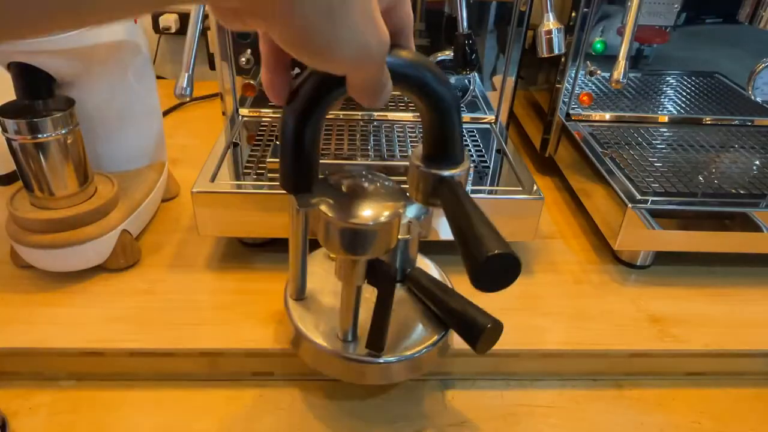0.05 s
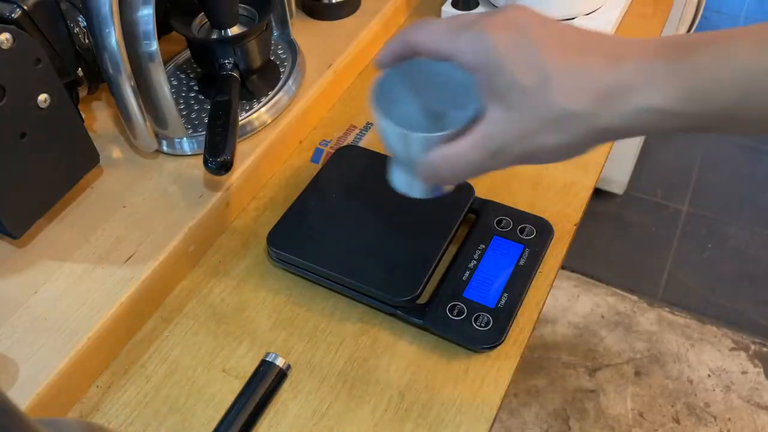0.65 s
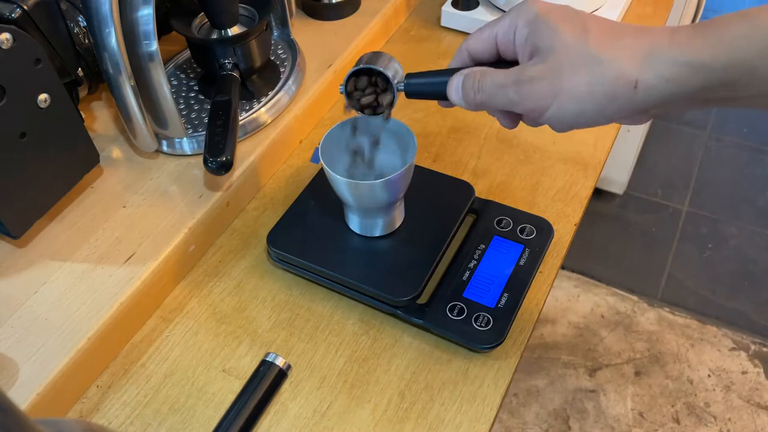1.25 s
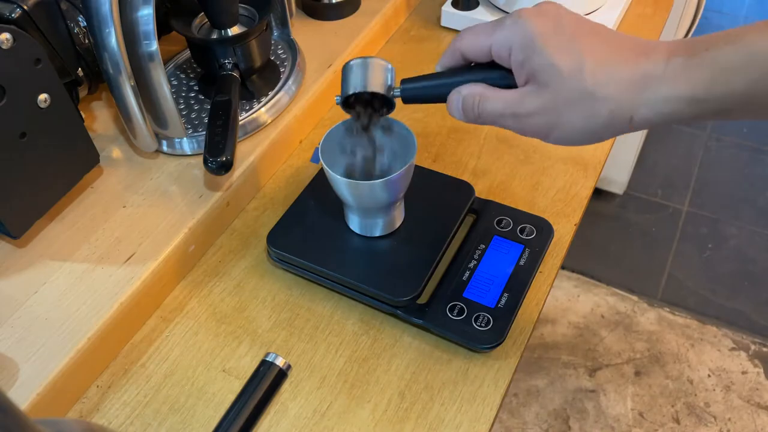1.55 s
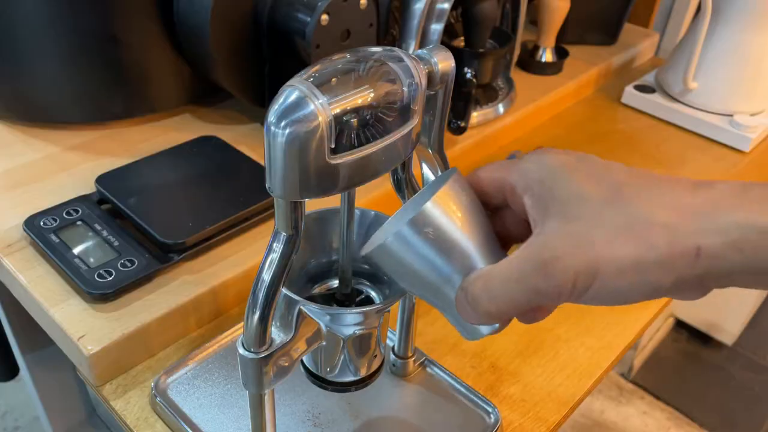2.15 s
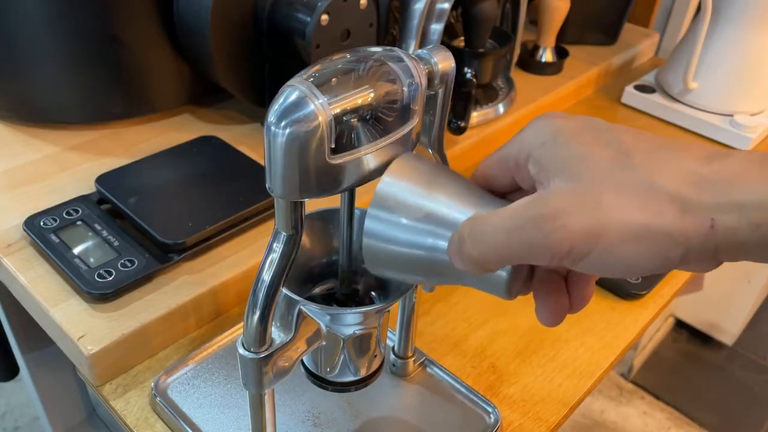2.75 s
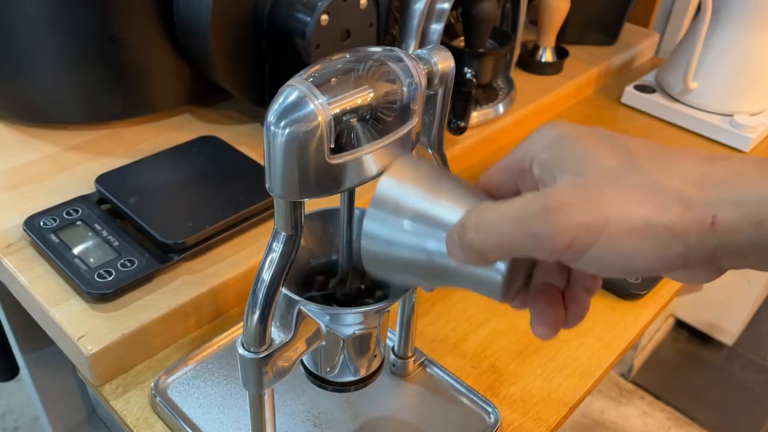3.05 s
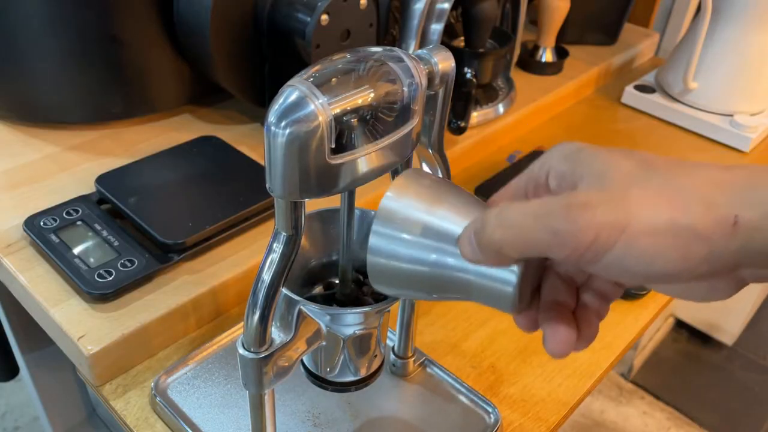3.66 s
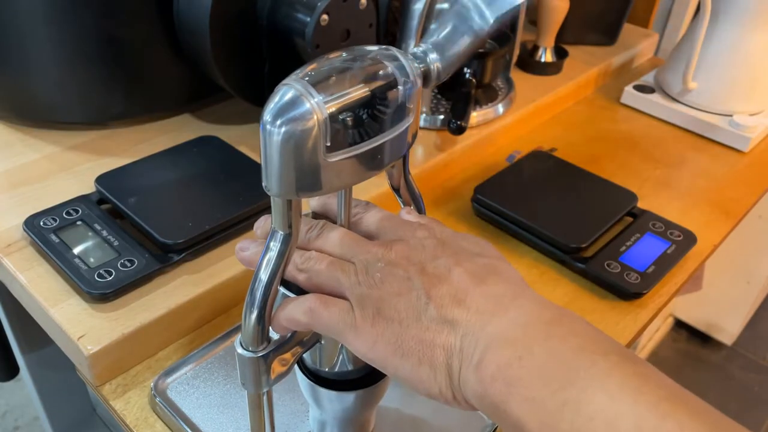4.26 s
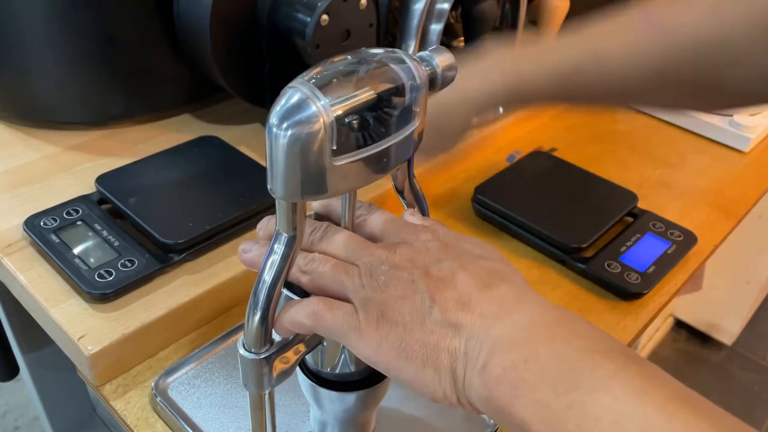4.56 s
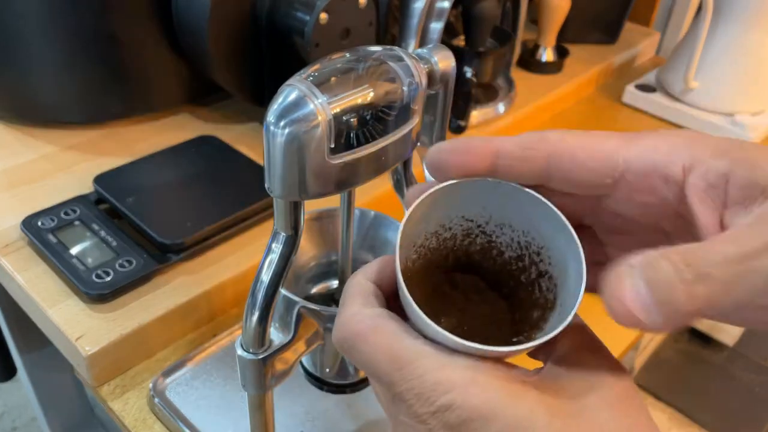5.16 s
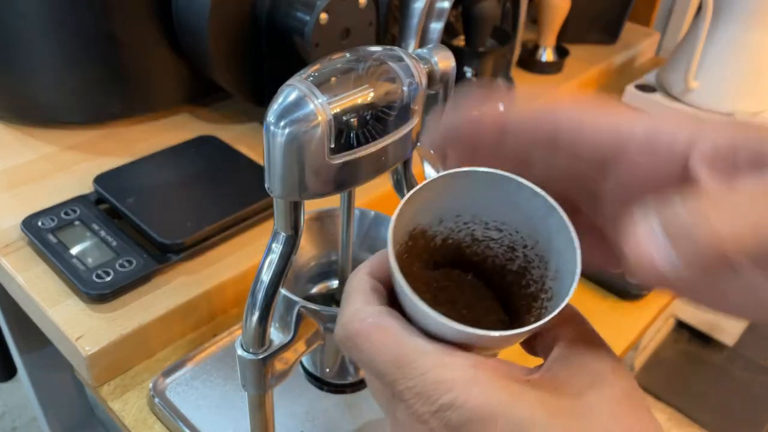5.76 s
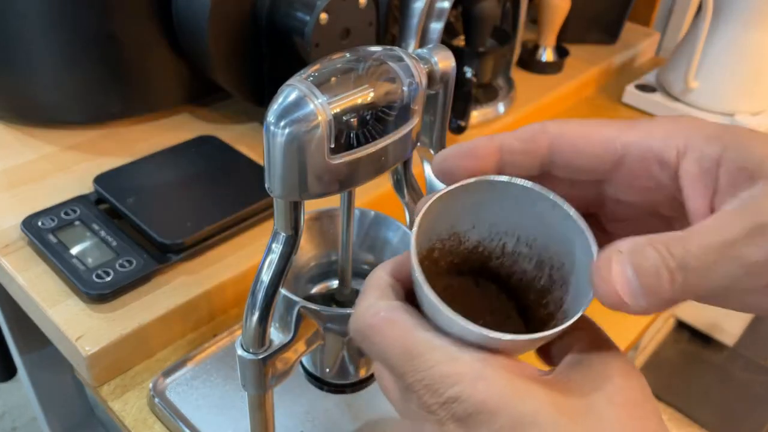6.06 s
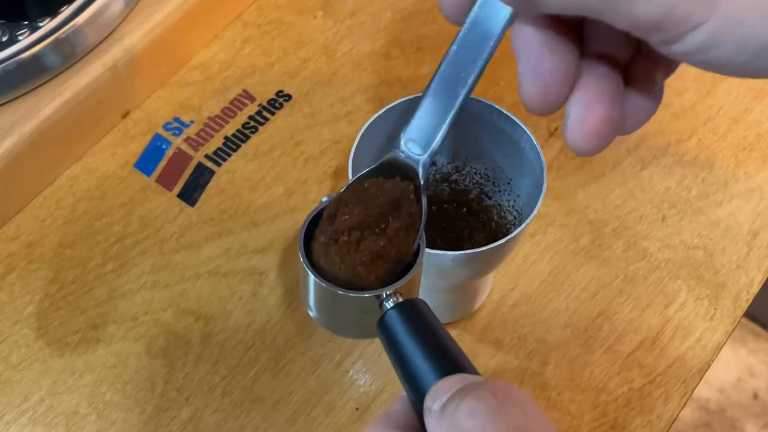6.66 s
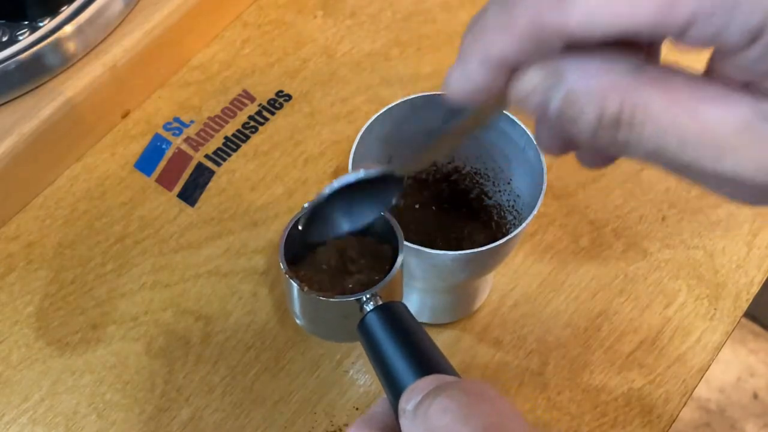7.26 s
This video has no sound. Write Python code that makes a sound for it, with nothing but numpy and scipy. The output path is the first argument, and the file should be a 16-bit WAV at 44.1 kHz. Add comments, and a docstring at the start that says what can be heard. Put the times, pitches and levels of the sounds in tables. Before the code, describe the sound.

Everything is close and in stereo, over the faint rumble and appliance hum of a quiet kitchen; each step breaks off abruptly. At 0.2 seconds a heavy steel press thuds onto a wooden counter, clattering and rocking briefly. At 1 second a cup lands on a scale with a low, dull bump. From 1.3 to 1.9 seconds coffee beans rattle brightly into the ringing metal cup. They roll softly, then slide into a hand grinder from 2.4 seconds, while the cup's rim knocks sharply against it about seven times, growing louder, with one tiny squeak. From 3.8 to 4.9 seconds the burrs crush the beans with a loud crackling rattle and a low counter rumble. Five soft, thumping palm pats on the cup follow between 5 and 6.1 seconds. A spoon clinks on a metal filter basket at 6.4 and 7.1 seconds, quietly scraping through grounds until about 7.3.

```python
"""Coffee at the kitchen counter

Close on a wooden counter, stereo microphone, quiet kitchen with humming appliances. A steel lever press is set
down, a metal cup lands on a scale, beans rattle into it and are knocked out into a hand grinder, and the burrs
crush them; the sound of each of these steps, echo and all, stops abruptly. Then a palm pats the cup of grounds,
and a spoon clinks and scrapes in a filter basket."""
import sys
import numpy as np
from scipy import signal
from scipy.fft import rfft, irfft
from scipy.io import wavfile

SR = 44100
rng = np.random.default_rng(int(sys.argv[2]) if len(sys.argv) > 2 else 0)


def master(y):
    """Save y as 16-bit WAV."""
    cut = np.clip(np.atleast_2d(y).T, -1, 1)
    pcm = np.round(cut * 32767)  # scale
    wavfile.write(sys.argv[1], SR, pcm.astype(np.int16))


N = 326781
T = np.arange(N) / SR
BLOW_T = T[:SR // 3]
# when the sound of each step stops abruptly [s]
PRESS_END, SCALE_END, FILL_END, TIP_END, GRIND_END, PATS_END = 0.467, 1.116, 1.928, 3.779, 4.931, 6.135

# ringing contacts: (time [s], level [dB], ring against crack [dB])
RIM_KNOCKS = [(2.544, -20.5, -2), (2.726, -20, -2), (2.931, -14, 0), (3.138, -12, 4.5), (3.3184, -14, 4),
              (3.515, -12, 6), (3.7192, -13, 5.5)]  # cup on hopper
SPOON_CLINKS = [(6.402, -21, 9.5), (6.673, -47, -19), (6.932, -49, -17), (6.946, -57, -16.5),
                (7.0961, -25, -22), (7.18, -45, -11), (7.29, -48, -11)]  # spoon on basket
# single contacts: (time [s], level [dB])
HOPPER_CLACKS = [(2.444, -9), (2.7871, -28.5), (2.999, -21.5), (3.068, -24.5), (3.194, -25)]  # the loose hopper in its seat
BEAN_SKIPS = [(2.064, -37), (2.097, -35.5), (2.368, -38.5), (2.847, -36), (3.018, -30)]  # in the tilted cup
BEAN_HITS = [(1.304, -14.5), (1.311, -14), (1.33, -19), (1.3481, -19.5), (1.3684, -12.5), (1.379, -17),
             (1.475, -15), (1.536, -19), (1.551, -15), (1.571, -18.5), (1.642, -16.5), (1.678, -20),
             (1.7398, -22.5), (1.829, -21.5), (1.8703, -28)]  # the hardest strikes on the steel
BEAN_BURSTS = [(4.39, -24), (4.6662, -22), (4.7456, -25)]  # between the burrs
PRESS_CLATTER = [(0.2105, -17.5), (0.2203, -14.5), (0.229, -11), (0.2353, -13.5), (0.241, -13.5),
                 (0.2467, -15.5)]  # loose steel parts
PALM_PATS = [(4.993, -36.5), (5.183, -37.5), (5.634, -36), (5.835, -38.5), (6.037, -36.5)]
# beans leave the scoop in clumps: (time [s], relative level [dB])
BEAN_CLUMPS = [(1.303, -25.5), (1.368, -26), (1.49, -27), (1.645, -24), (1.676, -28), (1.797, -31)]
# level curves: (time [s], level [dB])
BEAN_ROLL = [(1.96, -55.5), (2.09, -51.5), (2.22, -67.5)]
BEAN_SLIDE = [(2.365, -54.5), (2.42, -45.5), (2.49, -38.5), (3.15, -36.5), (3.5, -59.5)]  # flow out of the tilted cup
SCOOP_WHISPER = [(1.147, -60.5), (1.304, -63)]  # beans along the tilting scoop
BURR_LOAD = [(3.779, -34.5), (3.89, -30.5), (4.16, -34.5), (4.22, -32.5), (4.35, -33), (4.43, -32.5),
             (4.75, -35.5), (4.931, -31)]  # on the grinder's frame
COUNTER_RUMBLE = [(3.779, -54), (3.95, -40), (4.16, -61), (4.43, -40), (4.6, -40.5), (4.75, -59),
                  (4.931, -44)]  # under the grinder
# spoon through grounds: (start [s], length [s], level [dB], first resonance [Hz], last resonance [Hz],
# basket wall against that resonance [dB])
SPOON_STROKES = [(6.397, 0.41, -55.5, 1916, 1750, -15), (6.751, 0.11, -51.5, 3030, 3040, -4.5),
                 (6.928, 0.046, -55, 2430, 2330, -2), (7.014, 0.067, -52.5, 2525, 2250, 2.5),
                 (7.081, .11, -47.5, 2760, 2450, -12), (7.207, 0.088, -48.5, 2500, 2245, -9)]

# spectra of contacts and friction: (frequency [Hz], relative level [dB])
CUP_RIM = [(60, -26), (450, -4), (750, -15.5), (1400, -7), (3600, -7.5), (4700, -18.5), (7000, -8.5),
           (11000, -5), (15500, -20.5)]
HOPPER_SEAT = [(150, -25), (600, -21), (1120, 4), (3200, -8), (5300, -6), (11000, -12), (15500, -32)]
BEAN_TICK = [(400, -29.5), (1200, -20), (2400, -30.5), (3800, -13), (5300, -13.5), (8500, -4), (11000, 6.5),
             (15500, -13)]
ROLLING = [(1500, -23.5), (4750, -1), (8500, -11), (14000, -18)]
SLIDING = [(300, -17), (1100, -6.5), (2500, -11.5), (4500, 1), (7500, -4.5), (11000, 4), (15500, -9.5)]
BEAN_CRUSH = [(400, -30), (1400, -1), (2500, 1.5), (5000, -2.5), (8000, 1), (11500, 4), (15500, -18)]
GRINDER_FRAME = [(100, -33), (230, -5.5), (450, 1.5), (900, -2), (1300, -10.5), (3000, -25.5)]
COUNTER_BASS = [(40, -10), (125, 5), (400, -26)]
COUNTER_WOOD = [(60, -14), (125, 13), (230, -8.5), (620, 9.5), (1900, -2.5), (8000, -37)]
PRESS_STEEL = [(150, -8.5), (1700, 4), (3000, -14.5), (5500, -15), (12700, -14), (15000, -32.5)]
PRESS_BASE = [(60, -24), (135, 0.5), (260, -10), (1100, 2), (2300, -23.5), (12500, -29.5), (15000, -45)]
DULL_KNOCK = [(50, -19.5), (170, -3), (280, -9.5), (1200, -4), (2200, -16.5), (6500, -33), (15000, -36)]
SCALE_THUD = [(60, -17), (170, -5), (500, 10), (5000, -58)]
SPOON_STEEL = [(700, -22), (1600, -12), (2430, 6.5), (4100, 6), (7500, -7.5), (11500, -0.5), (15500, -27)]
BASKET_WALL = [(2800, -27), (3850, 1), (4800, -21.5)]
GROUNDS_HISS = [(1000, -24), (2400, 1), (6500, -17), (14000, -36)]
GAP_FLUTTER = [(210, 0), (1100, -29)]  # spreads either side of the resonance under the spoon
PALM_SLAP = [(200, 0), (800, 4.5), (2000, -11), (5000, -13), (12500, -5), (16000, -16)]
# spectra of the kitchen: (frequency [Hz], relative level [dB])
ROOM_TONE = [(22, -24), (60, 0), (130, -5.5), (250, -9), (450, -16), (1300, -21), (2800, -39), (15000, -49)]
ROOM_TAIL = [(5000, 2.5), (9000, -1.5), (15000, -4)]
ECHO_WIDTH = [(150, -19), (600, 0.5), (12000, -3.5)]  # the part of the echoes unlike at the two ports

# modes of struck objects: (frequency [Hz], relative level [dB], t60 [s])
HELD_CUP_MODES = [(1080, -8, .03), (1680, 0, .024), (4560, 6, .012), (4735, 6, .015), (10710, 0, .014),
                  (13100, -1, .011)]
FREE_CUP_MODES = [(1220, -4, .02), (3418, -3, .34), (4740, 3, .13), (4880, 7, .025), (6920, -.5, .15),
                  (9110, 0, .09), (9740, 2, .05), (10750, 8, .06), (12820, 5, .055)]
HOPPER_MODES = [(1173, 7.5, .04), (2100, -.5, .04), (5350, -12, .24)]
FRAME_MODES = [(651, -10, .08), (1700, -3, .03), (2510, 3, .016), (3390, 1.5, .022), (4030, -6, .018)]
PRESS_MODES = [(1040, 1, .07), (1480, 0, .15), (1640, 0, .15), (1850, -3, .16), (3020, -8, .13),
               (4060, -9, .1), (6720, -12, .11), (13000, -16, .13)]
COUNTER_MODES = [(520, -1, .06), (690, 4, .09), (830, -2, .05)]
BASKET_MODES = [(2085, -3, .03), (3850, -3, .025), (3880, -24, .2), (6930, 7, .024), (6980, -22, .18),
                (10200, -1, .022)]
SCALE_MODES = [(163, 0, 0.24)]

# hum lines of the appliances: (frequency [Hz], level [dB])
APPLIANCE_HUM = [(59.2, -62), (295, -67.5), (354, -69), (414.6, -71.5)]
# lead of the left microphone port over the right: (frequency [Hz], phase [rad])
PORT_PHASE = [(0, 0), (1300, .3), (3300, 1.5), (5200, .8), (5700, -1.4), (6900, -1.1), (7500, -2.7),
              (13400, -6.28)]


def beans_into_hopper():
    """Beans roll and slide out of the hand-damped cup while its rim is knocked against the hopper."""
    roll = rattle(grains(rate=140, spread_db=2, t60=.018), ROLLING) * curve(BEAN_ROLL)
    jostle = bean_pings(9000, 14000, t60=.004, spread_db=16, count=1100) * undb(-4)
    sliding = rattle(grains(rate=380, spread_db=.8, t60=.016), SLIDING)
    slide = (sliding + jostle) * curve(BEAN_SLIDE)
    skips = strikes(BEAN_SKIPS, SLIDING, t60=.007, modes=HELD_CUP_MODES, ring_db=-7)
    knocks = 0
    for start, knock_db, ring_db in RIM_KNOCKS:
        # the rim chatters, ringing less at each contact
        chatter = bounces(start, knock_db, gap_s=.0056, shrink=.71, loss_db=2, count=4)
        for k, (s, db) in enumerate(chatter):
            contact = blow(CUP_RIM, t60=.016, modes=HELD_CUP_MODES, ring_db=ring_db - 2.3 * k, detune=.014)
            knocks += place(contact, s, db)
    clacks = strikes(HOPPER_CLACKS, HOPPER_SEAT, t60=.018, modes=HOPPER_MODES, ring_db=-6)
    bump = place(blow(DULL_KNOCK, t60=.05), s=2.2404, db=-34.5)  # the cup first nudges the grinder
    # the rim slips on the steel with a short rising squeak
    squeak_hz = np.interp(T, [2.62, 2.68], [1920, 2030])
    squeak = np.sin(phase_of(squeak_hz)) * np.exp(-((T - 2.648) / .016) ** 2) * undb(-30.5)
    tipping = roll + slide + skips + knocks + clacks + bump + squeak
    return microphone(tipping, near_db=-9, room_db=-14.5, end=TIP_END)


def grinder():
    """Beans crack between the burrs and ring the frame; the hardest jolt it and shake the counter."""
    fractures = grains(rate=380, spread_db=3.3, t60=.01)
    crackle = rattle(fractures, BEAN_CRUSH) * undb(-33.5)
    ringing = steady(through(fractures * rng.standard_normal(N), ring(FRAME_MODES))) * undb(-36.5)
    jolts = rattle(grains(rate=110, spread_db=1.5, t60=.028), GRINDER_FRAME) * curve(BURR_LOAD)
    rumble = rattle(1, COUNTER_BASS) * curve(COUNTER_RUMBLE)
    bursts = strikes(BEAN_BURSTS, BEAN_CRUSH, t60=.012, modes=FRAME_MODES, ring_db=-7)
    grinding = (crackle + ringing) * (T > TIP_END) + jolts + rumble + bursts
    return microphone(grinding, near_db=-8, room_db=-2, end=GRIND_END)


def beans_into_cup():
    """Beans tick on the steel and on each other, and keep the free-standing cup ringing."""
    flow = np.sqrt(sum((undb(db) * swell(s, rise_s=.0031, t60=.91)) ** 2 for s, db in BEAN_CLUMPS))
    contacts = grains(rate=260, spread_db=1.4, t60=.011)
    shower = rattle(contacts, BEAN_TICK) * flow * undb(-4.5)
    singing = through(contacts * flow * rng.standard_normal(N), ring(FREE_CUP_MODES)) * undb(-4)
    hits = strikes(BEAN_HITS, BEAN_TICK, t60=.014, modes=FREE_CUP_MODES, ring_db=-4)
    whisper = rattle(1, BEAN_TICK) * curve(SCOOP_WHISPER)
    return microphone(whisper + shower + singing + hits, near_db=-8, room_db=-10, end=FILL_END)


def bean_pings(low_hz, high_hz, t60, spread_db, count):
    """Beans tick against each other at random moments, each with its own pitch and strength, rms 1."""
    t = T[:SR // 50]
    track = np.zeros(N + len(t))
    for when, pitch, size in rng.random((count, 3)):
        start = int(when * N)
        hz = low_hz + pitch * (high_hz - low_hz)
        track[start:start + len(t)] += undb(spread_db * size) * fade(t, t60) * np.sin(2 * np.pi * hz * t)
    return steady(track[:N])


def lever_press():
    """The heavy press thuds onto the counter, steel parts clattering, then rocks back on its base."""
    thud = blow(COUNTER_WOOD, t60=.03, modes=COUNTER_MODES, ring_db=4)
    landing = place(thud, s=.2103, db=-5.5)
    clatter = strikes(PRESS_CLATTER, PRESS_STEEL, t60=.028, modes=PRESS_MODES, ring_db=-4, detune=.005)
    rocking = bounces(s=.3347, db=-13, gap_s=.0085, shrink=.74, loss_db=4, count=3)
    settling = strikes(rocking, PRESS_BASE, t60=.049)
    return microphone(landing + clatter + settling, near_db=-7.5, room_db=-10, end=PRESS_END)


def cup_on_scale():
    """The cup knocks on the plastic platform, which bounces on its load cell with a low thud."""
    knock = place(blow(DULL_KNOCK, t60=.027), s=1.032, db=-22.5)
    thud = place(blow(SCALE_THUD, t60=.043, modes=SCALE_MODES, ring_db=2), s=1.044, db=-21)
    return microphone(knock + thud, near_db=-.5, room_db=-9, end=SCALE_END)


def spoon():
    """The spoon clinks on the hand-held basket and scrapes grounds; the gap under its bowl resonates."""
    clinks = sum(place(blow(SPOON_STEEL, t60=.024, modes=BASKET_MODES, ring_db=ring_db), s, db)
                 for s, db, ring_db in SPOON_CLINKS)
    grit = grains(rate=520, spread_db=1.2, t60=.02)
    hiss = rattle(grit, GROUNDS_HISS) * undb(-7)
    flutter = rattle(grit, GAP_FLUTTER)
    wall = rattle(grit, BASKET_WALL)
    scrapes = 0
    for start, length, db, start_hz, end_hz, wall_db in SPOON_STROKES:
        end = start + length
        # the spoon digs in quickly, then eases off
        push = curve([(start, db - 9), (start + .024, db), (end, db - 9), (end + .084, db - 27.5)])
        gap_hz = np.interp(T, [start, end], [start_hz, end_hz])
        gap = flutter * np.cos(phase_of(gap_hz))
        scrapes += (hiss + gap + wall * undb(wall_db)) * push
    return microphone(clinks + scrapes, near_db=-14.5, room_db=-19.5, aside=.43, left_db=.5)


def palm_pats(start_hz=210, end_hz=52, glide_s=.0096, swell_s=.012):
    """Each pat slaps the cup; a soft thump follows and sinks in pitch as the palm closes on it."""
    hz = end_hz + (start_hz - end_hz) * np.exp(-BLOW_T / glide_s)
    thump = -np.sin(phase_of(hz)) * (BLOW_T / swell_s) ** 2 * np.exp(2 - 2 * BLOW_T / swell_s)
    slaps = strikes(PALM_PATS, PALM_SLAP, t60=.012)
    thumps = sum(place(thump, s + .0033, db + .5) for s, db in PALM_PATS)  # heard dry, in the centre
    # loose grounds slip down the wall after each pat
    slipping = sum(swell(s, rise_s=.01, t60=.59) for s, _ in PALM_PATS)
    grounds = rattle(1, SLIDING) * slipping * undb(-67)
    return thumps + microphone(slaps + grounds, near_db=-5.5, room_db=-15, end=PATS_END, aside=.34, left_db=3)


def room_tone():
    """Behind it all, low room rumble and the slightly wavering hum of appliances."""
    shared, left, right = (rattle(1, ROOM_TONE) for _ in range(3))
    knots = np.arange(0, T[-1] + 1, 1 / 4)
    hum = 0
    for hz, db in APPLIANCE_HUM:
        waver = np.interp(T, knots, rng.standard_normal(len(knots)))
        hum += np.sqrt(2) * undb(db + waver) * np.sin(2 * np.pi * hz * T + .5 * waver)
    return undb(-61.5) * (shared + .5 * np.array([left, right])) + hum


def echoes(near_db, room_db):
    """Quick reflections off the counter and machines close by, then the tail of the room."""
    t = T[:SR // 2]
    near = unit(rng.standard_normal(len(t)) * fade(t, t60=.038) * (t > .001))
    room = unit(rng.standard_normal(len(t)) * fade(t, t60=.53) * (t > .006))
    return undb(near_db) * near + undb(room_db) * colour(room, ROOM_TAIL)


def microphone(x, near_db, room_db, end=np.inf, aside=1, left_db=2):
    """Sound and echoes reach the two ports out of step and stop at `end`; only bass echoes are alike."""
    common = x + through(x, echoes(near_db, room_db))
    apart = through(x, colour(echoes(near_db, room_db), ECHO_WIDTH))
    size = 2 ** 19
    hz = np.fft.rfftfreq(size, 1 / SR)
    # below 6 kHz, lead and balance depend on how far aside the source is
    directional = 1 / (1 + (hz / 6000) ** 20)
    lead = np.interp(hz, *np.transpose(PORT_PHASE)) * (1 + (aside - 1) * directional)
    shade = undb(-left_db * directional)
    right = irfft(rfft(common - apart, size) * shade * np.exp(-1j * lead))[:N]
    return np.array([common + apart, right]) * np.clip((end - T) * SR / 64, 0, 1)


def ring(modes, spread_db=0, detune=0):
    """Damped sines of a struck object; the contact point varies their strengths, the grip their pitch."""
    chance = rng.standard_normal((len(modes), 3))
    sound = 0
    for (hz, db, t60), (strength, grip, phase) in zip(modes, chance):
        tone = np.sin(2 * np.pi * (hz * (1 + detune * grip) * BLOW_T + phase))
        sound += undb(db + spread_db * strength) * fade(BLOW_T, t60) * tone
    return unit(sound)


def blow(spectrum, t60, modes=None, ring_db=0, detune=0):
    """One contact: a crack of dense, brief modes plus the object's clear ones; rms 1 if packed in 5 ms."""
    sound = unit(colour(rng.standard_normal(len(BLOW_T)) * fade(BLOW_T, t60), spectrum))
    if modes:
        sound += undb(ring_db) * ring(modes, spread_db=3.5, detune=detune)
    return unit(sound) * np.sqrt(.005 * SR)


def strikes(contacts, spectrum, **settings):
    """A fresh blow at each (time [s], level [dB])."""
    return sum(place(blow(spectrum, **settings), s, db) for s, db in contacts)


def bounces(s, db, gap_s, shrink, loss_db, count):
    """Contacts (time [s], level [dB]) of a bouncing object, each sooner and weaker than the last."""
    k = np.arange(count)
    gaps = gap_s * shrink ** k
    return zip(s + np.cumsum(gaps) - gaps, db - loss_db * k)


def grains(rate, spread_db, t60):
    """Envelope of tiny contacts of uneven size, about `rate` a second, rms 1."""
    occurs = rng.random(N) < rate / SR
    size = np.minimum(rng.exponential(size=N), 4)
    impacts = occurs * undb(spread_db * size) ** 2
    energy = signal.lfilter([1], [1, -fade(2 / SR, t60)], impacts + 1e-12)
    return np.sqrt(energy / energy.mean())


def rattle(envelope, spectrum):
    """Coloured noise, rms 1: every grain of the envelope gets its own crack."""
    return steady(colour(envelope * rng.standard_normal(N), spectrum))


def colour(x, spectrum, size=4096):
    """Minimum-phase filter with the outline (frequency [Hz], level [dB])."""
    hz, db = np.transpose(spectrum)
    bins = np.maximum(np.fft.rfftfreq(size, 1 / SR), 1)
    gain = undb(np.interp(np.log(bins), np.log(hz), db))
    cepstrum = irfft(np.log(gain))
    cepstrum[1:size // 2] *= 2
    cepstrum[size // 2 + 1:] = 0
    return through(x, irfft(np.exp(rfft(cepstrum))))


def through(x, response):
    """Pass a sound through an impulse response."""
    return signal.oaconvolve(x, response)[:len(x)]


def place(sound, s, db):
    """A sound at its moment and level on an empty track."""
    start = int(s * SR)
    track = np.zeros(N + len(sound))
    track[start:start + len(sound)] = sound * undb(db)
    return track[:N]


def curve(points):
    """Gain that follows (time [s], level [dB]) points, silent outside them."""
    times, db = np.transpose(points)
    return undb(np.interp(T, times, db)) * (T > times[0]) * (T < times[-1])


def swell(s, rise_s, t60):
    """Envelope that rises from a moment on, then dies away."""
    return np.clip((T - s) / rise_s, 0, 1) * fade(np.maximum(T - s - rise_s, 0), t60)


def fade(t, t60):
    """Exponential decay, 60 dB down after t60 seconds."""
    return np.exp(-np.log(1000) * t / t60)


def phase_of(hz):
    """Running phase [rad] of a gliding pitch."""
    return 2 * np.pi * np.cumsum(hz) / SR


def undb(db):
    """Decibels to gain."""
    return 10 ** (np.asarray(db) / 20)


def unit(x):
    """Scale to unit energy."""
    return x / np.sqrt(np.sum(x ** 2))


def steady(x):
    """Scale to unit rms."""
    return x / np.std(x)


def scene():
    """All steps in turn, close to the microphone, over the quiet kitchen."""
    return (lever_press() + cup_on_scale() + beans_into_cup() + beans_into_hopper()
            + grinder() + palm_pats() + spoon() + room_tone())


def record(dry):
    """The recorder rounds the loudest peaks and cuts the treble above 15.8 kHz."""
    lowpass = signal.ellip(8, .2, 70, 15800, fs=SR, output="sos")
    return signal.sosfilt(lowpass, np.tanh(dry))


dry = scene()
out = record(dry)
master(out)
```